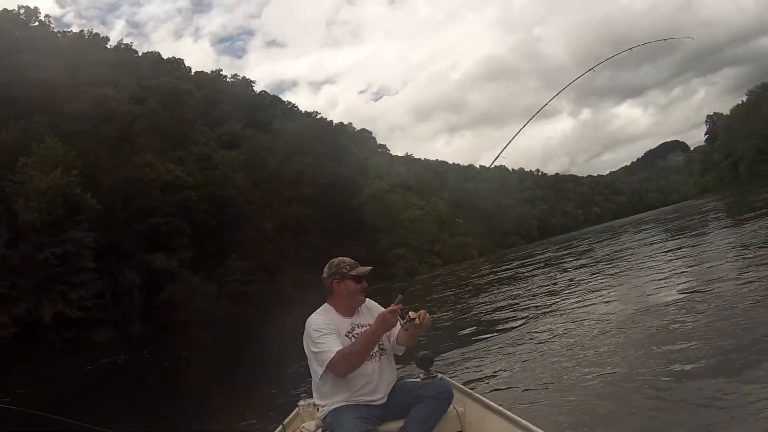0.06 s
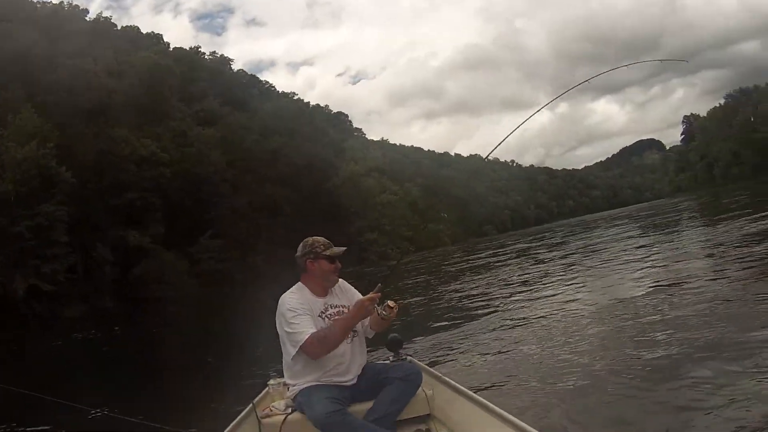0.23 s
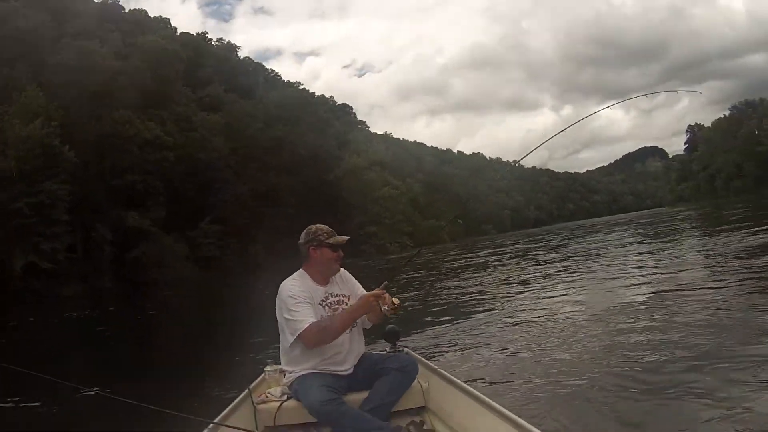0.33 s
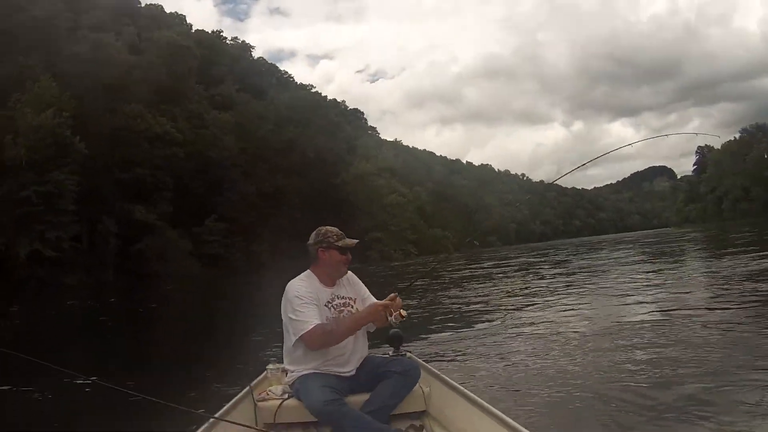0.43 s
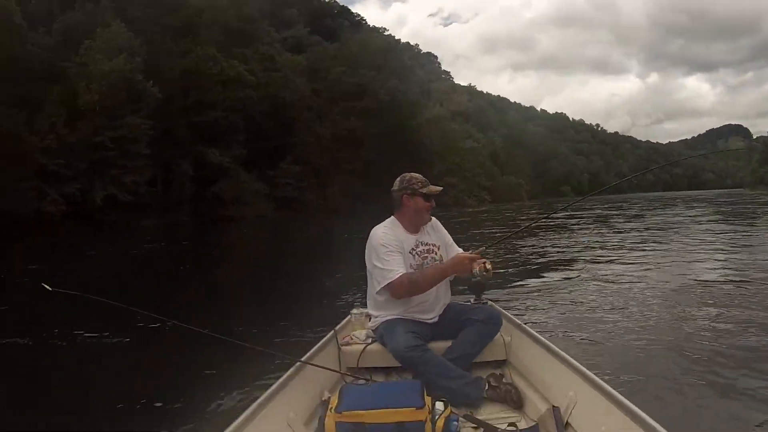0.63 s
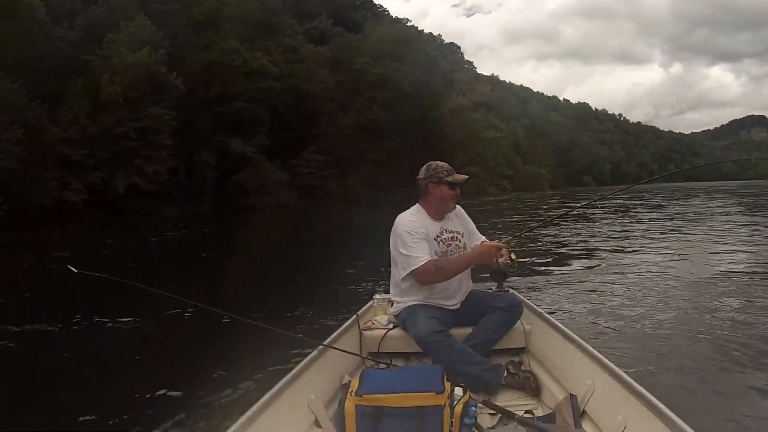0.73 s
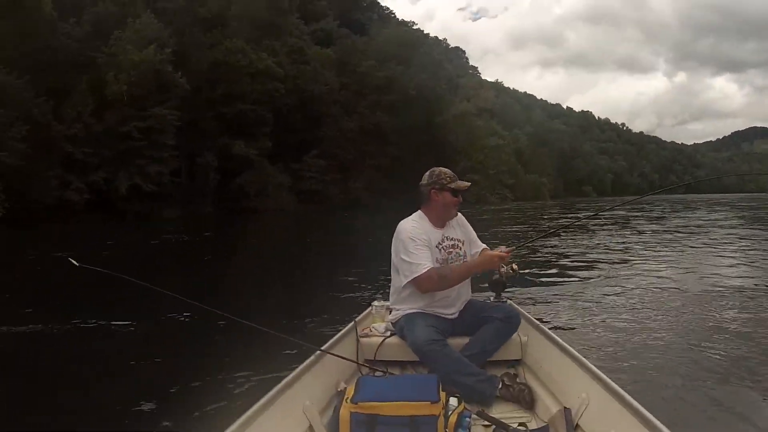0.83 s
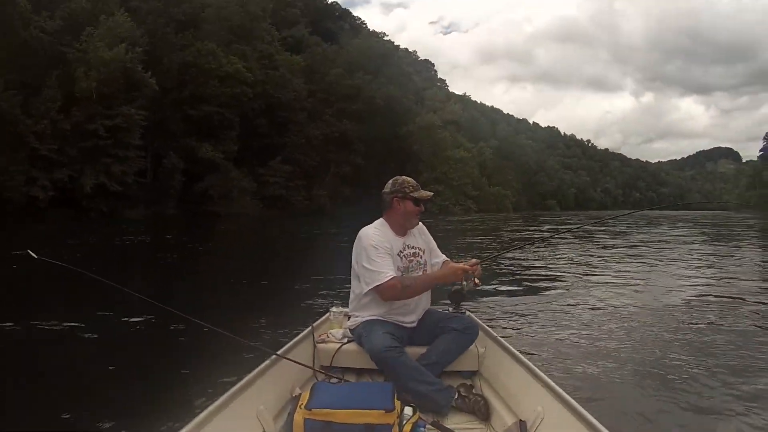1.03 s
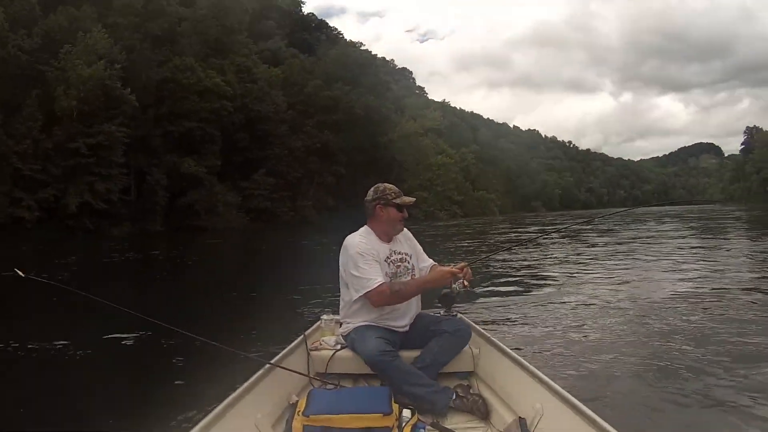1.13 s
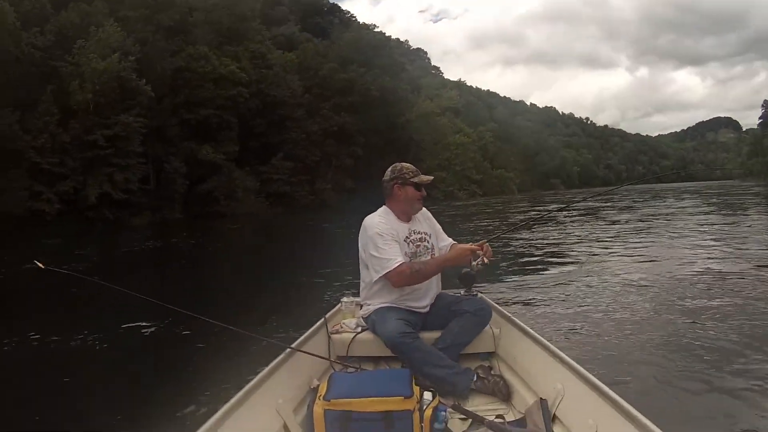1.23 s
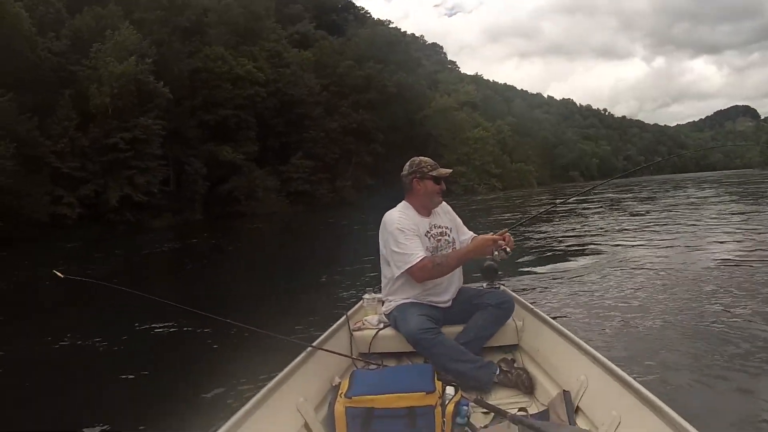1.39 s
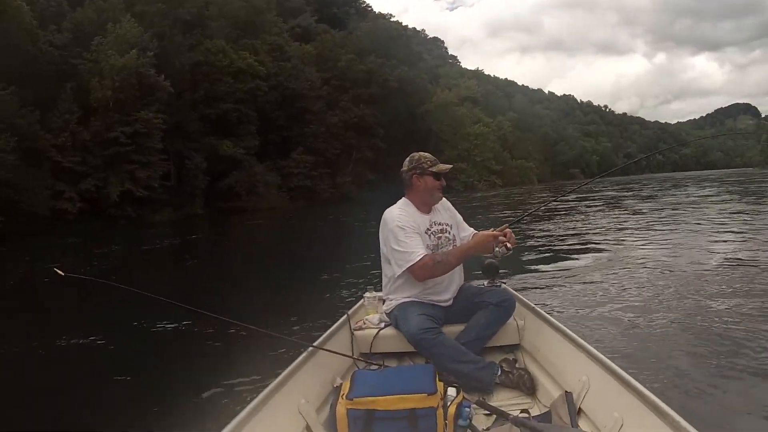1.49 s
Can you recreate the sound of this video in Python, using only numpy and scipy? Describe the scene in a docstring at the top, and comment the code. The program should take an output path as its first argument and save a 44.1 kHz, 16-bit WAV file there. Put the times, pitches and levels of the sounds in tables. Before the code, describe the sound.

One hard, dry knock on a plastic camera case in a boat, with small scuffs around it

```python
"""Knock on a case in a river boat

A small camera in a plastic case rides in an aluminium boat on a quiet river.
One hard knock, with a far weaker one just after it, excites the damped modes of case and hull.
Scuffs and ticks before and after it are gritty noise driving the same case modes.
Behind lie shaped noise for wind and water, a rustle coloured by the case, and a faint whine
of narrow-band noise around a tone that rises, then sags slightly."""
import sys
import numpy as np
from scipy import signal
from scipy.fft import rfft, irfft
from scipy.io import wavfile
from scipy.ndimage import uniform_filter1d

SR = 44100
rng = np.random.default_rng(int(sys.argv[2]) if len(sys.argv) > 2 else 0)


def waveform_to_disk(signal):
    """Save audio, clipped to [-1, 1], as 16-bit WAV at the path in sys.argv[1]."""
    frames = np.transpose(np.atleast_2d(signal))
    scaled = np.clip(frames, -1, 1) * 32767
    samples = np.round(scaled).astype(np.int16)
    wavfile.write(sys.argv[1], SR, samples)


N = 68355  # length of the scene [samples]


def amp(db):
    """Decibel law: a level in dB becomes an amplitude ratio."""
    return 10 ** (np.asarray(db) / 20)


def unit_rms(x):
    """Normalisation: scales a signal to a root-mean-square of one."""
    return x / np.sqrt(np.mean(x ** 2) + 1e-20)


def add(mix, start_s, sound):
    """Superposition: sums a sound into the mix from its start time."""
    part = mix[round(start_s * SR):][:len(sound)]
    part += sound[:len(part)]


def coloured(x, spectrum):
    """Spectral shaping: weights x by (frequency [Hz], level [dB]); near silence under the first point."""
    point_hz, point_db = np.transpose(spectrum)
    hz = np.fft.rfftfreq(len(x), 1 / SR)
    gain_db = np.interp(np.log(hz + 1), np.log(point_hz), point_db, left=-99)
    return irfft(rfft(x) * amp(gain_db), len(x))


def lumpy(patchy_db, swell_db):
    """Non-stationary noise: its short-time spectrum has drifting patches and a shared flicker."""
    frames = N // 128 + 6
    real, imag, patches = rng.standard_normal((frames, 257, 3)).T
    flicker = unit_rms(uniform_filter1d(rng.standard_normal(frames), size=6))
    patches = uniform_filter1d(patches, size=5, axis=0)  # across frequency
    patches = unit_rms(uniform_filter1d(patches, size=16, axis=1))  # across time
    spectra = (real + 1j * imag) * amp(patchy_db * patches + swell_db * flicker)
    return signal.istft(spectra, nperseg=512, noverlap=384)[1][:N]


# spectrum of wind and water: (frequency [Hz], relative density [dB per Hz])
AIR_SPECTRUM = [(15, -18.5), (30, 4.5), (50, -3), (80, -12.5), (160, -11.5), (260, -19.5), (400, -30),
                (900, -32), (2500, -36.5), (4000, -41), (8000, -49), (12000, -55.5), (14500, -65),
                (16000, -98.5)]
AIR_DB = -48.5  # rms level


def river_air():
    """Broadband flow noise: random pressure with a spectrum that falls towards the treble."""
    noise = lumpy(patchy_db=.6, swell_db=.4)
    return amp(AIR_DB) * unit_rms(coloured(noise, AIR_SPECTRUM))


# uneven course of the deepest rumble: (time [s], level [dB])
RUMBLE_LEVEL = [(0.0, -42.5), (0.15, -43), (0.176, -57.5), (0.24, -32.5), (0.332, -38.5), (0.59, -43.5),
                (0.616, -52), (0.686, -33.5), (0.794, -40), (0.816, -42), (1.092, -45), (1.19, -38.5),
                (1.22, -53.5), (1.328, -37), (1.38, -50), (1.424, -35), (1.45, -47), (1.55, -47.5)]


def rumble():
    """Amplitude modulation: very low noise, levelled by its running rms, follows a level curve."""
    t = np.arange(N) / SR
    deep = coloured(rng.standard_normal(N), [(12, 5.5), (30, 0.5), (45, -25.5), (70, -39), (200, -87)])
    steady = deep / np.sqrt(uniform_filter1d(deep ** 2, size=4000))
    return steady * amp(np.interp(t, *np.transpose(RUMBLE_LEVEL)))


# modes of the case: (frequency [Hz], level when knocked [dB], first swing [+1 out, -1 in],
# time to decay by 60 dB when knocked [s])
CASE_MODES = [(575, -38, 1, .06), (801, -16, -1, .022), (910, -42, 1, .03), (1215, -13.6, -1, .026),
              (1279, -6, -1, .017), (1400, -36, 1, .03), (1483, -.4, 1, .014), (1860, -13, 1, .012),
              (2000, -32, 1, .04), (2090, -6, -1, .015), (2220, -32, 1, .045), (2446, -30, 1, .037),
              (2720, -32, -1, .025), (3050, -38, -1, .045), (3650, -36, 1, .045), (4030, -36, -1, .025),
              (4500, -42, 1, .025)]
# how strongly rubbing excites each case mode: (level [dB])
RUBBED_DB = [-8.5, -43.5, -15, -2.5, -8.5, 2.5, 2.5, -1.5, -2.5, -1, -3.5, -16.5, -11, -36, -21.5, -12, -23]
RUB_RING = 1.3  # decay time when rubbed, relative to knocked


def rubbed_case(lean_db, t):
    """Modal impulse response: the case under light rubbing is a sum of decaying sines."""
    hz, _, _, t60 = np.transpose(CASE_MODES)[:, :, None]
    db = (np.array(RUBBED_DB) + lean_db)[:, None]
    return (amp(db - 60 * t / (RUB_RING * t60)) * np.sin(2 * np.pi * hz * t)).sum(0)


# course of the rustle: (time [s], level [dB])
RUSTLE_LEVEL = [(0.0, -60.5), (0.578, -59), (0.764, -57), (0.94, -56.5), (1.1, -59), (1.316, -56),
                (1.55, -56.5)]


def rustle():
    """Resonant filtering: fluctuating noise is convolved with the ring of the case."""
    t = np.arange(N) / SR
    ringing = signal.fftconvolve(lumpy(patchy_db=1.7, swell_db=-2.2), rubbed_case(0, t[:3000]))[:N]
    return unit_rms(ringing) * amp(np.interp(t, *np.transpose(RUSTLE_LEVEL)))


# spectrum of the bright grit: (frequency [Hz], level [dB])
GRIT_SPECTRUM = [(2500, -2), (2900, 0), (3400, -5), (4300, -1), (5000, -7), (5700, -6), (6600, -15),
                 (10000, -26), (15000, -46)]
# band of the dull thump: (lower edge [Hz], upper edge [Hz])
THUMP_BAND = [70, 260]
STROKE_RISE = .2  # fraction of the stroke
FAVOUR_OCT, GRIT_DB = .3, 3.2  # octaves from the favoured pitch for a 5 dB drop; unevenness in dB


def scuff(length, db, favour_hz, treble_db, thump_db):
    """Friction excitation: uneven noise drives case modes near one pitch, with bright grit and a thump."""
    mode_hz = np.transpose(CASE_MODES)[0]
    t = np.arange(0, length + .05, 1 / SR)  # leaves time to ring on
    progress = np.clip(t / length, 0, 1)
    stroke = np.minimum(progress / STROKE_RISE, 1) * np.cos(np.pi / 2 * progress)
    rub, roughness, thud = rng.standard_normal((len(t), 3)).T
    grit = rub * amp(GRIT_DB * unit_rms(uniform_filter1d(roughness, size=60))) * stroke

    lean_db = np.maximum(-5 * (np.log2(mode_hz / favour_hz) / FAVOUR_OCT) ** 2, -15)
    body = unit_rms(signal.fftconvolve(grit, rubbed_case(lean_db, t[:2000]))[:len(t)])
    treble = amp(treble_db) * unit_rms(coloured(grit, GRIT_SPECTRUM))
    thump_filter = signal.butter(4, THUMP_BAND, "band", fs=SR, output="sos")
    thump = amp(thump_db) * unit_rms(signal.sosfilt(thump_filter, thud * stroke))
    # refer the body's energy to the stroke alone, not to its ringing time as well
    stroke_share = np.sqrt(length * SR / len(t))
    return amp(db) * stroke_share * (body + treble + thump)


# scuffs and ticks: (start [s], length [s], body level [dB], favoured pitch [Hz],
# treble relative to body [dB], thump relative to body [dB])
SCUFFS = [(.189, 0.0032, -45.5, 1800, -23, -1.5), (0.194, 0.011, -42, 1620, -19, -21),
          (0.2058, 0.0045, -38.5, 1500, -26.5, -24.5), (0.2106, 0.0094, -28, 1420, -28, -6),
          (0.278, 0.0076, -45, 1590, -19.5, -19), (0.539, 0.13, -59, 1400, -12, -20),
          (0.809, 0.004, -64.5, 2000, 0, -16), (1.047, 0.026, -57.5, 1425, -8, -16),
          (1.18, 0.022, -73, 1300, -10, -20), (1.294, 0.045, -58, 1660, -6.5, -12),
          (1.316, 0.01, -39, 1760, -8, -19), (1.327, 0.0075, -41.5, 1920, -28, 0),
          (1.343, 0.011, -42, 1420, -44, -10), (1.351, 0.021, -41, 1920, -11, -18),
          (1.364, 0.034, -46, 1480, -10, -9.5), (1.387, 0.018, -45.5, 1450, -16, -10.5),
          (1.4, 0.039, -52.5, 1450, -39, 2.5), (1.502, 0.024, -56, 1300, -8, 1),
          (0.566, 0.064, -65, 4420, -17, -30)]


def scuffs():
    """Superposition: separate strokes of rubbing add where they overlap."""
    out = np.zeros(N)
    for start_s, *stroke in SCUFFS:
        add(out, start_s, scuff(*stroke))
    return out


# blows: (time [s], gain [dB])
KNOCKS = [(.2232, .4), (.2757, -38)]
# low, then humming mode of the hull: (frequency [Hz], level [dB], time to decay by 60 dB [s])
HULL_MODES = [(37, -22, .095), (266, -20.5, .084)]
# spectrum of the brief crack: (frequency [Hz], level [dB])
CRACK_SPECTRUM = [(2600, -4), (3300, 0), (5200, -3), (6500, -8), (9300, -17), (9900, -32), (11000, -26),
                  (13500, -33), (15500, -46)]
CONTACT_S = .00037  # onset of the ringing
PUSH_DB, PUSH_S = -17.5, .0029  # relative to the blow; duration
CRACK_DB, CRACK_T60, CRACK_RISE_S = -23.5, .012, .001  # relative to the blow; times in s


def knocks():
    """Impact excitation: a short contact rings case and hull, with a push of air and a brief crack."""
    t = np.arange(0, .3, 1 / SR)
    case = np.zeros(len(t))
    for hz, db, swing, t60 in CASE_MODES:
        case += swing * amp(db - 60 * t / t60) * np.sin(2 * np.pi * hz * t)
    (low_hz, low_db, low_t60), (hum_hz, hum_db, hum_t60) = HULL_MODES
    # the cubic decay holds the low mode, then ends it quickly
    hull = amp(low_db - 60 * (t / low_t60) ** 3) * np.sin(2 * np.pi * low_hz * t)
    hull -= amp(hum_db - 60 * t / hum_t60) * np.sin(2 * np.pi * hum_hz * t)

    contact = np.sin(np.pi / 2 * np.minimum(t / CONTACT_S, 1)) ** 2
    push = -amp(PUSH_DB) * np.sin(np.pi * np.minimum(t / PUSH_S, 1)) ** 2
    crack_envelope = amp(CRACK_DB - 60 * t / CRACK_T60) * np.minimum(t / CRACK_RISE_S, 1)
    out = np.zeros(N)
    for start_s, gain_db in KNOCKS:
        crack = unit_rms(coloured(rng.standard_normal(len(t)), CRACK_SPECTRUM)) * crack_envelope
        add(out, start_s, amp(gain_db) * (contact * (case + hull) + push + crack))
    return out


# course of the whine: (time [s], frequency [Hz], level [dB])
WHINE_COURSE = [(.62, 2148, -88), (0.751, 2189, -64), (0.819, 2313, -68), (.97, 2330, -64),
                (1.051, 2360, -60), (1.151, 2350, -68), (1.25, 2300, -86)]
WHINE_WIDTH_HZ = 15


def whine():
    """Frequency shifting: slow complex noise plus a constant rides on a carrier that rises, then sags."""
    t = np.arange(N) / SR
    point_s, point_hz, point_db = np.transpose(WHINE_COURSE)
    pole = np.exp(-np.pi * WHINE_WIDTH_HZ / SR)
    real, imag = signal.lfilter([1], [1, -pole], rng.standard_normal((N, 2)), axis=0).T
    fuzz = unit_rms(real) + 0.62 + 1j * unit_rms(imag)  # the constant is the steady tone
    carrier = np.exp(2j * np.pi * np.cumsum(np.interp(t, point_s, point_hz)) / SR)
    level = amp(np.interp(t, point_s, point_db, left=-120, right=-120))
    return unit_rms((fuzz * carrier).real) * level


def scene():
    """Superposition: the pressures of all sources add in one channel."""
    mix = river_air() + rumble() + rustle() + scuffs() + knocks() + whine()
    return mix[None]


KNEE = .6  # amplitude where squeezing begins; full scale is 1
EDGE_HZ = 15200


def record(dry):
    """Soft saturation and band limiting: peaks above the knee are squeezed, then the top is cut."""
    over = np.maximum(abs(dry) - KNEE, 0)
    squeezed = np.sign(dry) * (abs(dry) - over + (1 - KNEE) * np.tanh(over / (1 - KNEE)))
    lowpass = signal.firwin(511, EDGE_HZ, window=("kaiser", 9), fs=SR)
    return signal.oaconvolve(squeezed, lowpass[None], "same")


dry = scene()
out = record(dry)
waveform_to_disk(out)
```